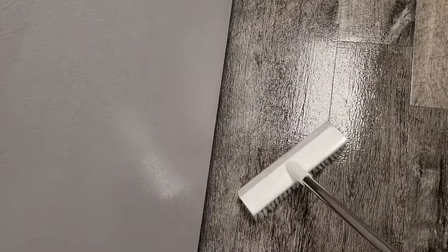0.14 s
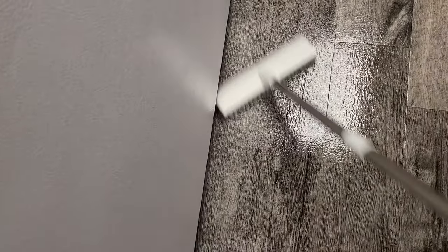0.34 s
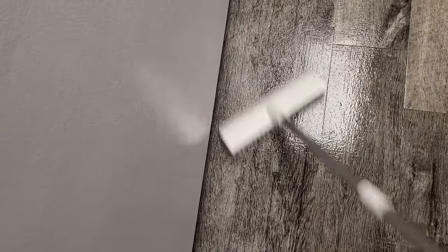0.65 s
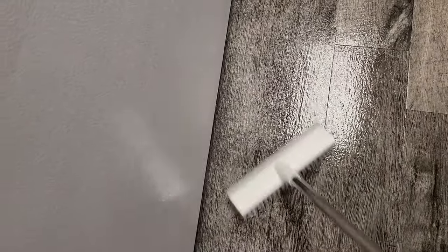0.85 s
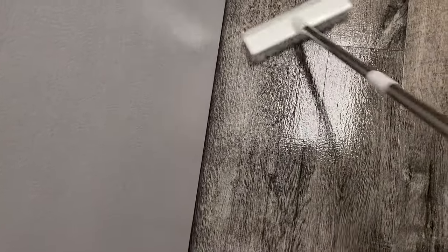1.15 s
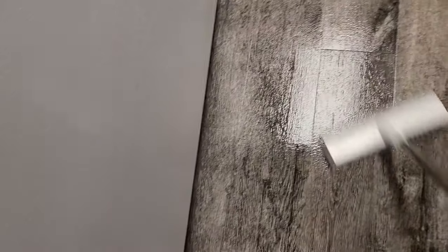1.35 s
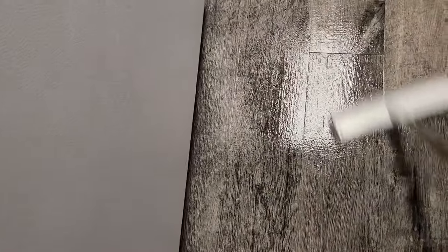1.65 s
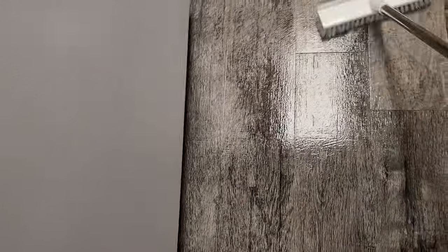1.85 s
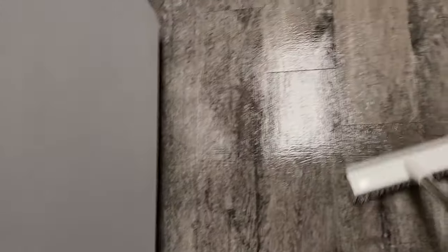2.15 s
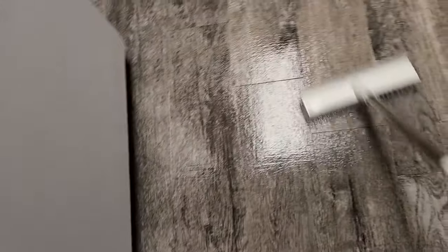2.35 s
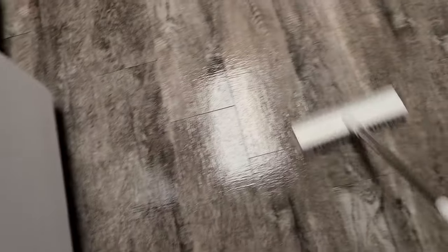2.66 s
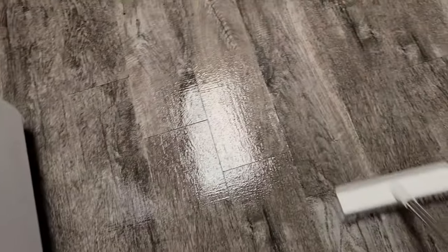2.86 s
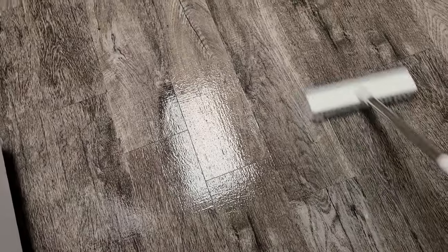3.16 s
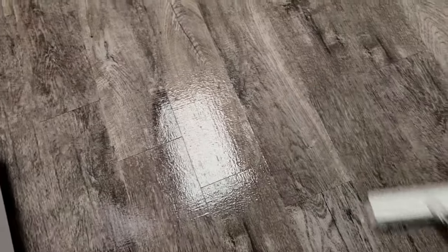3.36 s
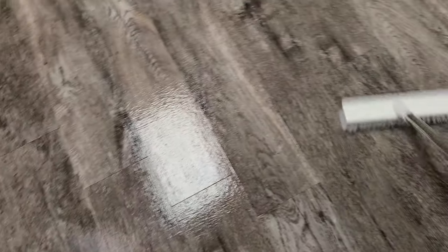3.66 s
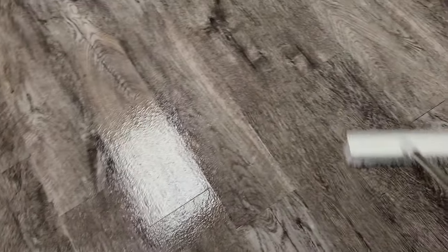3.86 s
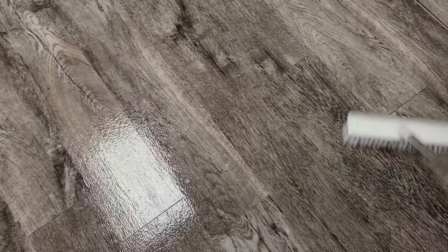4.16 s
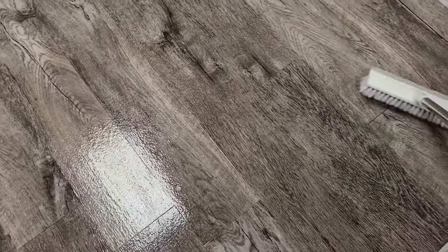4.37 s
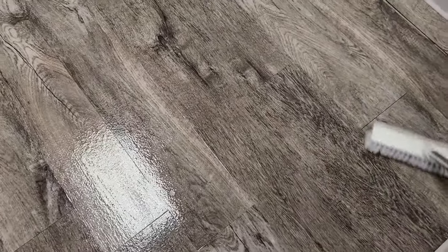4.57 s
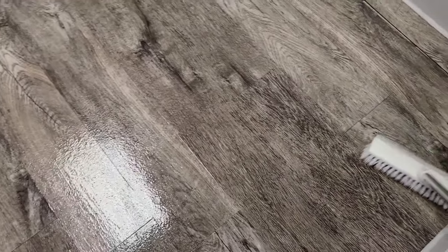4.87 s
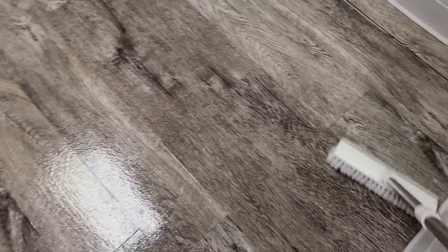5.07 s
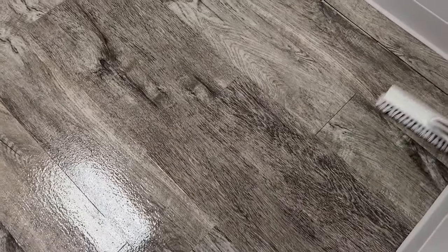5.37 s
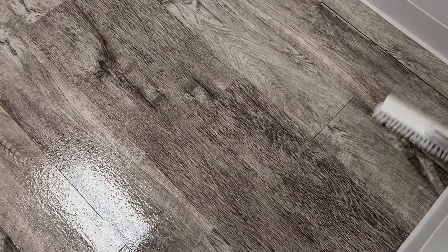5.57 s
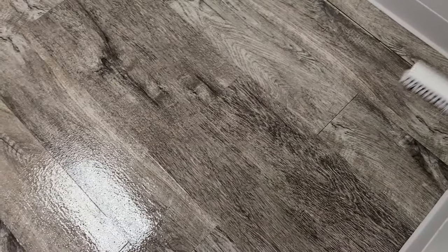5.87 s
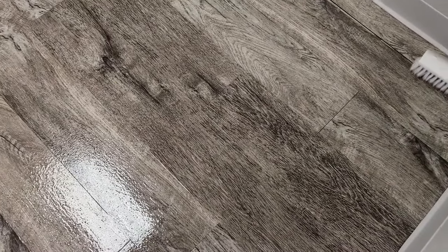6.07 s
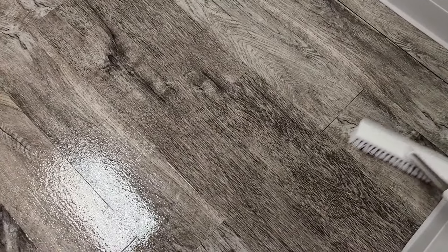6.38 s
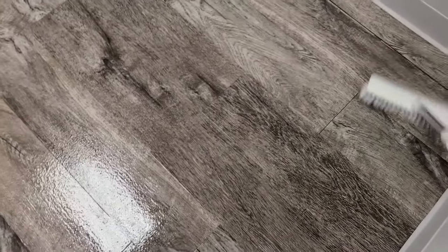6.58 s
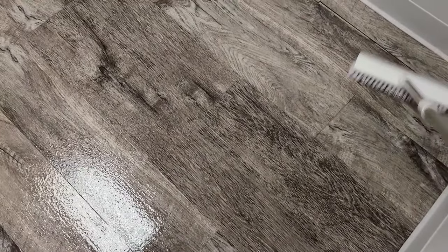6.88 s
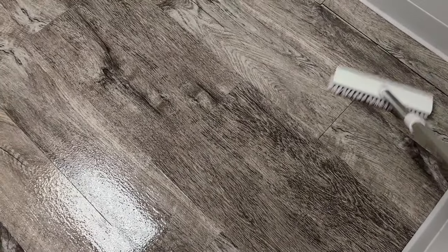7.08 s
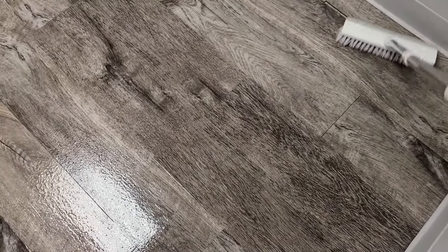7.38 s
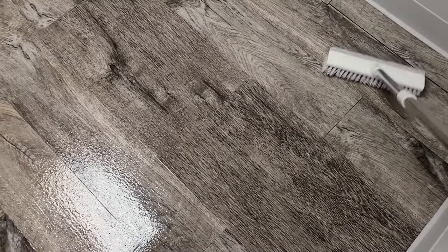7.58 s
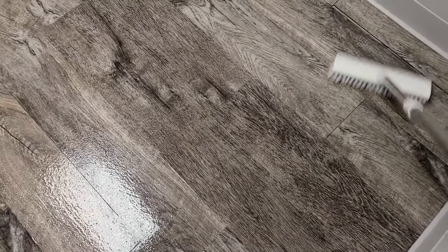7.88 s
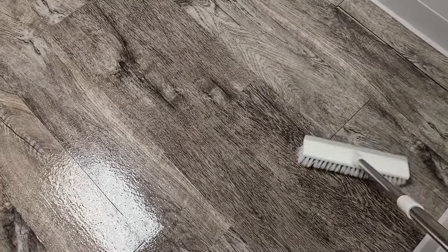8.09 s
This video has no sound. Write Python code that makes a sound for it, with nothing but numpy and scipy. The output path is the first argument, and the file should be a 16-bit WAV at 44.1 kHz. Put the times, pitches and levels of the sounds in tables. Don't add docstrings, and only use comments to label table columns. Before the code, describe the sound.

A stiff brush scrubs wet planks in quick scratchy back-and-forth strokes, pausing midway for a sharp knock and a heavy low floor thump.

```python
import sys
import numpy as np
from scipy import signal
from scipy.fft import rfft, irfft, next_fast_len
from scipy.io import wavfile
from scipy.ndimage import uniform_filter1d, map_coordinates

SR = 44100
rng = np.random.default_rng(int(sys.argv[2]) if len(sys.argv) > 2 else 0)


def level_to_linear(level):
    exponent = np.asarray(level, float) / 20
    return 10 ** exponent


def dump_mix(stems):
    frames = np.atleast_2d(stems).T
    limited = np.clip(frames, -1, 1)
    pcm = np.round(limited * 32767).astype(np.int16)
    wavfile.write(sys.argv[1], SR, pcm)


N = 363384


def unit(x):
    return x / np.sqrt(np.mean(x ** 2) + 1e-20)


def along(points, hz):
    f, v = np.transpose(points)
    return np.interp(np.log(hz + 1), np.log(f + 1), v)


def curves(rows):
    s, *cols = np.transpose(rows)
    return [np.interp(np.arange(N) / SR, s, c) for c in cols]


def wobble(rate):
    return map_coordinates(rng.standard_normal(3000), [np.arange(N) * min(rate, 300) / SR])


def filtered(x, response):
    n = x.shape[-1]
    m = next_fast_len(n + SR // 4, True)
    return irfft(rfft(x, m) * response(np.fft.rfftfreq(m, 1 / SR)), m)[..., :n]


def resonant(x, modes):
    def body(f):
        total = 0
        for k, (centre, width, db) in enumerate(modes):
            damping = 1j * f * width
            total = total + (-1) ** k * level_to_linear(db) * damping / (centre * centre - f * f + damping)
        return total
    return unit(filtered(x, lambda f: body(f) ** 2))


def shifted(x, by_hz):
    whole = signal.hilbert(x, next_fast_len(N))[:, :N]
    return np.real(whole * np.exp(2j * np.pi * np.cumsum(by_hz) / SR))


def slips(rate, spread_db, patchy_db, size=6):
    chance = rng.random((2, N)) - .5
    strength = level_to_linear(spread_db * rng.standard_normal((2, N))) * np.sign(chance)
    happens = abs(chance) < rate / SR / 2
    z = signal.stft(happens * strength, nperseg=512)[2]
    field = uniform_filter1d(rng.standard_normal(z.shape[1:]), size, 0)
    field = uniform_filter1d(field, size, 1)
    return signal.istft(z * level_to_linear(patchy_db * unit(field)), nperseg=512)[1][:, :N]


# turnaround in seconds, tip hiss left at the turn in dB,
# fastest hiss in dB, where in the stroke it is fastest (0-1). The last row only closes the last stroke.
STROKES = [(-0.15, -35, -37.5, 0.73), (0.187, -47, -35.0, 0.36), (0.505, -53, -35.5, 0.55),
           (0.827, -46, -36, 0.5), (1.143, -46, -34, 0.66), (1.533, -42.5, -34.5, 0.38),
           (1.859, -53, -35.5, 0.62), (2.22, -45.5, -35, 0.29), (2.513, -52, -35, 0.56),
           (2.869, -41.5, -35, 0.42), (3.147, -46.5, -35, 0.68), (3.45, -45, -37.5, 0.44),
           (3.766, -48.5, -41, 0.52), (4.024, -52, -38, 0.52), (4.31, -57.5, -57, 0.08),
           (4.45, -75, -55, 0.4), (4.74, -61, -62, 0.01), (4.885, -75, -44.5, 0.35),
           (5.045, -52, -37, 0.59), (5.501, -53, -39, 0.62), (5.693, -48, -36, 0.32),
           (6.057, -53.5, -34.0, 0.68), (6.441, -42.5, -33.5, 0.47), (6.792, -52.5, -35.0, 0.55),
           (7.057, -43, -34.5, 0.32), (7.349, -54.5, -37, 0.62), (7.597, -45.5, -37, 0.41),
           (7.774, -47, -33.0, 0.72), (8.144, -46, -38, 0.43), (8.36, -50, -36, 0.5)]
LAW = 1.62
DWELL_S = .012


def swell(top_db, place, arch):
    turn_s, left_db, fast_db, _ = np.transpose(STROKES)
    share, point = arch

    def lower(v):
        return np.minimum(np.r_[v[0], v], np.r_[v, v[-1]])

    dip_db = lower(fast_db[:-1]) - left_db
    rest = level_to_linear((lower(top_db) - share * dip_db) / LAW)
    t = np.arange(N) / SR
    k = np.clip(np.searchsorted(turn_s, t) - 1, 0, len(top_db) - 1)
    length = np.diff(turn_s)[k]
    u, peak = (t - turn_s[k]) / length, np.clip(place, .05, .95)[k]
    rising = u < peak
    start = np.where(rising, rest[k], rest[k + 1])
    phase = np.where(rising, u / peak, (1 - u) / (1 - peak))
    dwell = DWELL_S / (length * np.where(rising, peak, 1 - peak) + DWELL_S)
    phase = np.clip((phase - dwell) / (1 - dwell), 0, 1)
    climb = np.abs(np.sin(np.pi / 2 * phase)) ** point
    return (start + (level_to_linear(top_db / LAW)[k] - start) * climb) ** LAW


# frequency in Hz, level in dB per Hz.
HISS = [(2060, -18), (3500, -3), (4070, -2.5), (4880, -2.5), (5490, -8.5), (6460, -8), (10300, -1),
        (12100, -1.5), (14500, -6), (15600, -16.5)]
TIP_ARCH, FIZZ_ARCH = (0.96, 0.84), (1.32, 0.99)
FIZZ_HZ = 7000


def bristle_tips(judder):
    fast_db, fastest = np.transpose(STROKES)[2:, :-1]
    tips = unit(filtered(slips(30000, 2.66, patchy_db=1.55, size=16), lambda hz: level_to_linear(along(HISS, hz))))
    fizz = filtered(tips, lambda hz: 1 / (1 + (FIZZ_HZ / (hz + 1)) ** 8))
    hiss = (tips - fizz) * swell(fast_db, fastest, TIP_ARCH)
    hiss = hiss + fizz * swell(fast_db, fastest, FIZZ_ARCH)
    return hiss * level_to_linear(0.49 * judder + 0.48 * wobble(11))


# frequency in Hz, width in Hz, level in dB.
TUFTS = [(2275, 1465, 1), (3340, 1690, 2)]
# time in seconds, tuft pitch in Hz.
BEND = [(0, 2350), (.8, 2300), (1.37, 2730), (3.1, 2780), (3.83, 2450), (4.2, 2740), (4.5, 2370),
        (5.03, 2350), (5.2, 3110), (5.6, 2750), (5.8, 3150), (6.35, 2750), (7.7, 2900), (8.24, 2650)]
REST_HZ = [2800, 1450]
TUFT_ARCH = (0.76, 0.99)
TUFT_FOLLOWS_HEAD = 0.1
CATCH_TUFT_DB = -15


def bristle_tufts(judder, tuft_db, bite, catch):
    fastest = np.transpose(STROKES)[3, :-1]
    tufts = resonant(slips(20000, 2.5, patchy_db=2.0), TUFTS)
    tufts = shifted(tufts, curves(BEND)[0] - REST_HZ[0])
    place = fastest + TUFT_FOLLOWS_HEAD * (bite - fastest)
    level = swell(tuft_db, place, TUFT_ARCH) + level_to_linear(CATCH_TUFT_DB) * catch
    return tufts * level_to_linear(1.15 * judder + 0.27 * wobble(6)) * level


# frequency in Hz, width in Hz, level in dB.
HEAD_CLEAR = [(1450, 430, 0)]
# frequency in Hz, width in Hz, level in dB.
HEAD_BROAD = [(1097, 610, 0.5), (1680, 1100, 1.5)]
# time in seconds, share (0-1).
SPREAD = [(0, 0.87), (1.1, 0.84), (1.4, 0.67), (3.2, 1), (3.5, 0.9), (4.9, 0.4), (5.2, 1), (7.85, 0.32),
          (8.05, 0.47), (8.24, 0.4)]
# time in seconds, head pitch in Hz.
HEAD_PITCH = [(0, 1544), (.3, 1577), (.85, 1455), (1.3, 1700), (2.1, 1593), (2.7, 1680), (3.3, 1600),
              (3.5, 1408), (4.2, 1522), (4.6, 1476), (4.9, 1312), (5.05, 1600), (5.55, 1361), (6.2, 1380),
              (6.8, 1546), (7, 1453), (7.6, 1600), (8.06, 1428)]
HEAD_ARCH = (0.76, 1.43)
BROAD_SLIDES = .3


def brush_head(low, judder, head_db, bite, catch):
    broad = np.clip(curves(SPREAD)[0], 0, 1)
    slide_hz = curves(HEAD_PITCH)[0] + 70 * wobble(25) - REST_HZ[1]
    clear = shifted(resonant(low, HEAD_CLEAR), slide_hz)
    wide = shifted(resonant(low[:, ::-1], HEAD_BROAD), BROAD_SLIDES * slide_hz)
    head = (np.sqrt(1 - broad) * clear + np.sqrt(broad) * wide) * swell(head_db, bite, HEAD_ARCH)
    head = head + clear * catch
    return head * level_to_linear(0.65 * judder + 1.5 * wobble(110) + 0.35 * wobble(27))


# frequency in Hz, width in Hz, level in dB.
PLANKS = [(446, 450, -4.5), (724, 397, 3), (940, 450, 0)]
PLANK_ARCH = (0.19, 3.9)
CATCH_PLANK_DB = -18


def planks(low, plank_db, bite, catch):
    level = swell(plank_db, bite, PLANK_ARCH) + level_to_linear(CATCH_PLANK_DB) * catch
    return resonant(low, PLANKS) * level_to_linear(wobble(18)) * level


# tuft ring in dB, head ring in dB, where the head bites (0-1),
# plank rumble in dB.
LEAN = [(-36.5, -38.5, 0.88, -56.5), (-35, -33.5, 0.6, -53), (-36.5, -37, 0.57, -56.5),
        (-35.5, -36.5, 0.57, -52), (-32, -45, 1, -62), (-33.5, -43, 0.64, -56), (-33.5, -46, 0.93, -63),
        (-32, -45.5, 0.44, -59.5), (-31, -37.0, 0.96, -52), (-34.5, -43.5, 0, -57),
        (-33.5, -32.5, 0.73, -46), (-39.5, -41.5, 0.77, -54.0), (-41.5, -35.5, 0.36, -48),
        (-43, -41.5, 0.62, -51.5), (-61, -62, 0, -59.5), (-42, -43, 0.6, -45.5), (-55, -66, 0.15, -56),
        (-37.5, -35.5, 0.25, -39), (-45, -44, 0.7, -52.5), (-42.5, -35.5, 0.6, -54),
        (-43, -43.5, 0.09, -54.5), (-36.5, -34, 0.91, -46), (-41, -42.5, 0, -54), (-39.5, -39, 0.34, -57),
        (-41.0, -40, 0.01, -55), (-40, -44.5, 0.84, -61.5), (-41.0, -49, 0.1, -65), (-36, -37, 0.8, -43.5),
        (-46.5, -44, 0.1, -53.5)]
# time in seconds, level in dB, half length in seconds.
CATCHES = [(.225, -33, .02), (0.313, -48, 0.025), (0.778, -40, 0.016), (1.449, -43, .04), (1.657, -47, .02),
           (2.24, -38.5, .02), (3.488, -35, 0.024), (3.655, -41, 0.018), (3.906, -54, 0.017),
           (5.314, -40, 0.011), (5.736, -42, .02), (6.222, -38.5, .03), (6.648, -38, 0.04),
           (6.919, -41, 0.022), (7.185, -62, 0.015), (7.492, -45.5, 0.037), (7.644, -36.5, 0.037),
           (8.05, -32, 0.032), (8.165, -37, 0.018)]


def brush():
    tuft_db, head_db, bite, plank_db = np.transpose(LEAN)
    t = np.arange(N) / SR
    judder = wobble(70)
    catch = sum(level_to_linear(db) * np.exp(-((t - s) / half) ** 2) for s, db, half in CATCHES)
    low = slips(9000, 3.15, patchy_db=2.64)
    return (bristle_tips(judder) + bristle_tufts(judder, tuft_db, bite, catch)
            + brush_head(low, judder, head_db, bite, catch) + planks(low, plank_db, bite, catch))


# time in seconds, peak in dB, splash in dB, dull thud in dB, pitch ratio.
TAPS = [(.198, -29, -6.5, -12.5, 0.82), (.841, -23.5, -10, -21, 0.98), (2.099, -29, -25, -22, 0.72),
        (4.418, -54, -29, -18, 0.22), (4.472, -36.5, 2.5, -30, 0.97), (4.545, -8.5, -28.5, -26.5, 1.01),
        (4.887, -50, 4, -20, 0.96), (5.005, -27, -21, -25, 1), (5.547, -19, -23, -27, 0.9),
        (6.089, -51, 3, 17, 0.89), (6.464, -21, -31, -32, 0.95), (8.013, -33, -14, -12, 0.39)]
# frequency in Hz, level in dB.
KNOCK = [(720, -8), (1430, -3), (1540, 21), (2000, -9), (2370, -4), (2940, -19), (3600, -3), (5000, -4)]
TAP_T60 = 0.034


def taps():
    out, t = np.zeros((2, N + SR)), np.arange(SR // 3) / SR
    noise = rng.standard_normal((2, 2 * SR))
    wet = resonant(noise, [(1370, 1310, 0.0), (3300, 2950, -1.0), (9100, 21000, -11.5)])
    dull = resonant(noise, [(246, 250, 0), (382, 390, 0)])
    for s, db, splash_db, thud_db, tune in TAPS:
        at = round(s * SR)
        piece = slice(at % SR, at % SR + len(t))
        ring = sum(level_to_linear(level + rng.normal(0, 2.5)) * np.sin(2 * np.pi * tune * hz * t)
                   for hz, level in KNOCK)
        ring = ring * level_to_linear(-19.5 - 60 * t / TAP_T60) * (1 - np.exp(-t / 0.0014))
        splash = (level_to_linear(splash_db - 60 * t / 0.62) + level_to_linear(-18.0 - 60 * t / 0.077)) * wet[:, piece]
        splash = splash * (1 - np.exp(-t / .003))
        thud = level_to_linear(thud_db - 60 * t / 0.14) * (1 - np.exp(-t / 0.028)) * dull[:, piece]
        out[:, at:at + len(t)] += level_to_linear(db) * (ring * [[1], [.3]] + splash + thud)
    return out[:, :N]


# time in seconds, peak in dB.
THUMP = [
    (4.763, -10),
]
# frequency in Hz, level in dB, t60 in seconds.
JOISTS = [(65.6, -5, 0.37), (91.1, -6, 0.53), (130.2, -3.5, 0.46), (149, -2, 0.25), (187, 3, 0.32),
          (231, -7.5, 0.42), (290, -10, 0.44), (351, 0, 0.3), (402, -2.5, 0.34), (470, -7.5, 0.26),
          (545, -7, 0.16), (578, -13.5, 0.29), (690, -10.5, 0.18)]
SPREAD_S, EARLIEST_S = 0.1173, 0.0038
PUSH_FROM_HZ, PUSH_TO_HZ, PUSH_GLIDE_S, PUSH_PEAK_S = 480, 90, .006, .007
BLOOM_S = .01


def thump():
    out, t = np.zeros((2, N)), np.arange(SR) / SR
    noise = rng.standard_normal((2, 2, SR))
    ring = 0
    for k, (hz, db, t60) in enumerate(JOISTS):
        since = np.maximum(t - max(SPREAD_S / np.sqrt(hz) - EARLIEST_S, 0), 0)
        ring = ring + (-1) ** k * level_to_linear(db - 60 * t / t60) * np.sin(2 * np.pi * hz * since)
    glide_hz = PUSH_TO_HZ + (PUSH_FROM_HZ - PUSH_TO_HZ) * np.exp(-t / PUSH_GLIDE_S)
    pulse = (t / PUSH_PEAK_S * np.exp(1 - t / PUSH_PEAK_S)) ** 2
    push = level_to_linear(8.5) * pulse * np.sin(2 * np.pi * np.cumsum(glide_hz) / SR)
    boom = resonant(noise[0], [(103, 57, -1), (200, 125, 0.94), (370.4, 310, -2.65)])
    boom = boom * level_to_linear(-5) * level_to_linear(-60 * t / .34)
    crack = resonant(noise[1], [(900, 2900, 12.4), (3120, 4300, 4.5)])
    crack = crack * (level_to_linear(-15.5 - 60 * t / 0.25) + level_to_linear(-22 - 60 * t / 0.051)) * (1 - np.exp(-t / .0022))
    bloom = 1 - np.exp(-t / BLOOM_S)
    blow = (bloom * ring + push) * [[1], [-.15]] + bloom * boom + crack
    for s, db in THUMP:
        out[:, round(s * SR):][:, :SR] += level_to_linear(db - 7) * blow
    return out


# frequency in Hz, relative level in dB, unsteadiness in dB.
HUM = [(60.35, -51, 1.5), (120.6, -65, 3)]
# frequency in Hz, level in dB per Hz.
AIR = [(13, -41), (22, -59), (43, 1), (67, -2.5), (82, -3), (107, -15), (163, -13.5), (395, -18.5),
       (499, -25.5), (771, -22.5), (900, -31), (1170, -27), (1980, -120)]
AIR_DB, FAINT_DB = -48.5, -65


def hum():
    t = np.arange(N) / SR
    lines = 0
    for hz, db, shaky_db in HUM:
        level = level_to_linear(db + 7.5 + shaky_db * wobble(3.2))
        lines = lines + level * np.sin(2 * np.pi * hz * t + 0.37 * wobble(1.8))
    rumble = unit(filtered(rng.standard_normal((2, N)), lambda hz: level_to_linear(along(AIR, hz))))
    faint = resonant(rng.standard_normal((2, N)), [(1500, 1300, -9), (9300, 3500, -26)])
    return lines * [[1], [0]] + level_to_linear(AIR_DB) * rumble + level_to_linear(FAINT_DB) * faint


# frequency in Hz, t60 in seconds.
ROOM = [(100, 0.4), (500, 0.38), (2000, 0.28), (10000, 0.031)]


def room(x):
    hz, t, z = signal.stft(rng.standard_normal((2, SR // 2)), SR, nperseg=256)
    tail = signal.istft(z * level_to_linear(-60 * t / along(ROOM, hz)[:, None]), SR, nperseg=256)[1]
    late = np.pad(x[0], (300, 0))[None]
    return signal.fftconvolve(late, tail / np.linalg.norm(tail[0]), axes=1)[:, :N]


# frequency in Hz, left-right likeness (0-1).
ALIKE = [(60, 0.98), (250, 0.91), (600, 0.57), (1300, 0.49), (2200, 0.19), (3500, 0.12), (7400, 0.061),
         (7800, 0.72), (9600, 0.98), (11000, 1), (12500, 0.85), (15000, 0.56)]
# frequency in Hz, left minus right in dB.
PORTS = [(60, -1.5), (99, -1.5), (160, 1), (270, -2), (450, -2.0), (740, -1.5), (1220, -3), (2010, 0),
         (3330, -6), (5500, 5.5), (9080, 2), (15000, 9.5)]
# time in seconds, left port lag in microseconds.
BEARING = [(0, -6), (1, 9), (1.3, 96), (3, 81), (4.5, 195), (6, 194), (7.7, 122), (8.24, 49)]
JOINT_HZ = 7600


def ports(pair):
    def turn(hz):
        return np.arccos(np.clip(along(ALIKE, hz), 0, 1)) / 2
    mid, side = filtered(pair, lambda hz: np.array([np.cos(turn(hz)), np.sin(turn(hz))]))
    both = np.array([mid + side, mid - side])
    both = filtered(both, lambda hz: level_to_linear(along(PORTS, hz) * [[.5], [-.5]]))
    low = filtered(both[0], lambda hz: hz < JOINT_HZ)
    late = map_coordinates(low, [np.arange(N) - curves(BEARING)[0] * SR / 914000.0])
    return np.array([both[0] - low + late, both[1]])


BOUNCE_HZ, BOUNCE_WIDTH_HZ, BOUNCE_DEPTH = 868, 300, 0.29
WALLS_DB = -14


def scene():
    def bounce(hz):
        return 1 - BOUNCE_DEPTH * np.exp(-((hz - BOUNCE_HZ) / BOUNCE_WIDTH_HZ) ** 2)
    hits = taps()
    scrub = filtered(brush(), bounce)
    walls = room(level_to_linear(WALLS_DB) * scrub + level_to_linear(-15) * hits)
    return ports(scrub + hits + walls + thump() + hum())


def low_pass(x):
    return signal.sosfilt(signal.butter(12, 16420, fs=SR, output="sos"), x)


TOP_HZ = 15770


def record(dry):
    mix = filtered(dry, lambda hz: hz < TOP_HZ)
    return low_pass(mix)


dry = scene()
out = record(dry)
dump_mix(out)
```